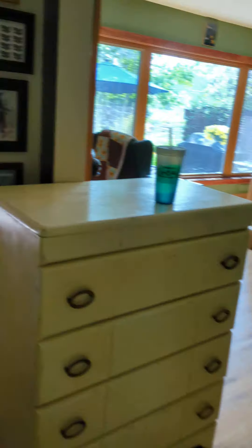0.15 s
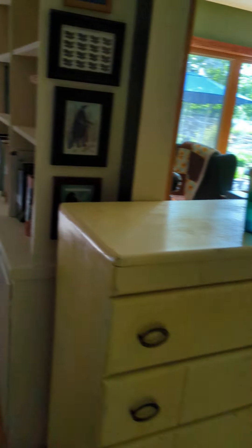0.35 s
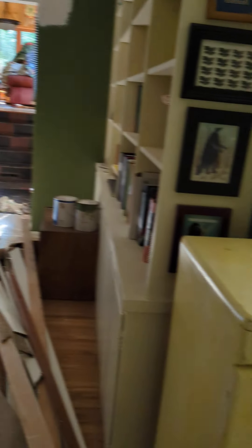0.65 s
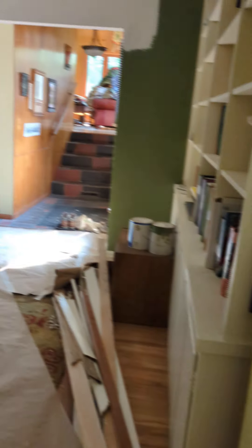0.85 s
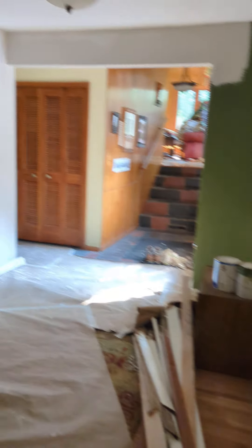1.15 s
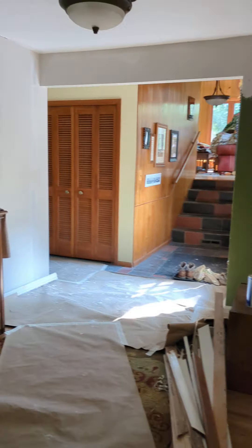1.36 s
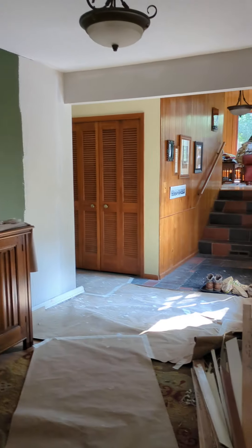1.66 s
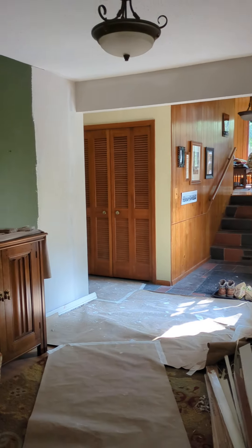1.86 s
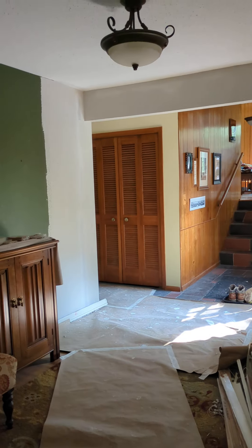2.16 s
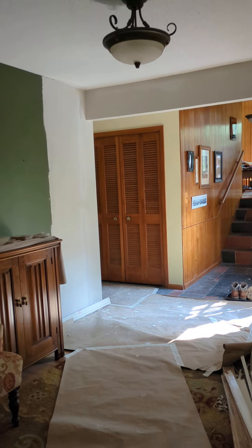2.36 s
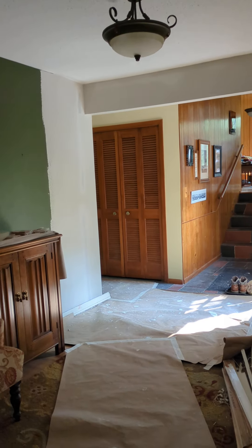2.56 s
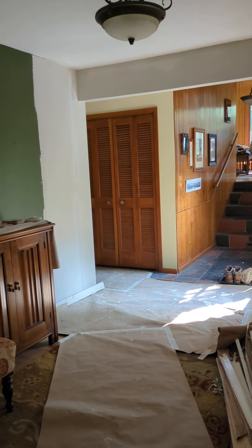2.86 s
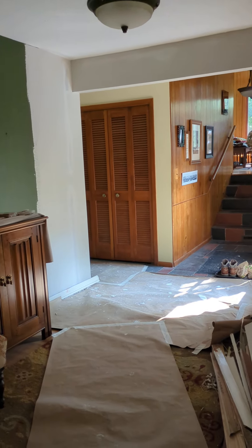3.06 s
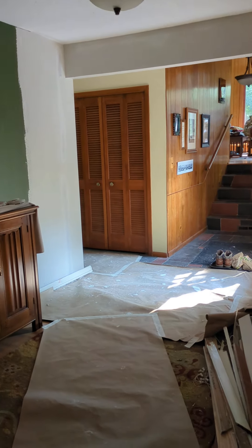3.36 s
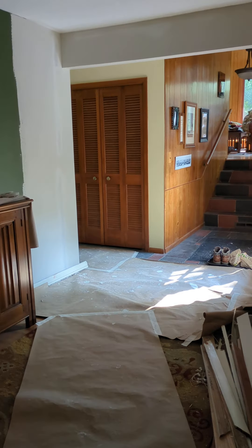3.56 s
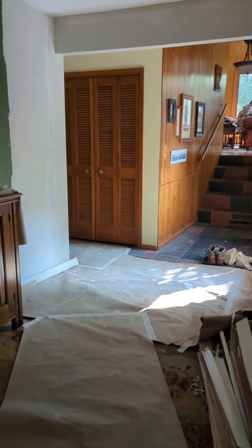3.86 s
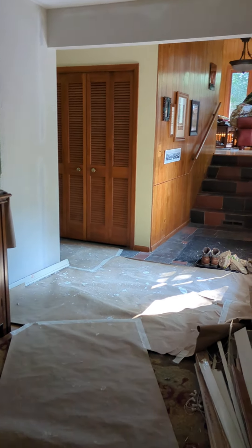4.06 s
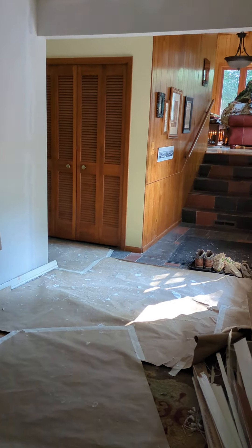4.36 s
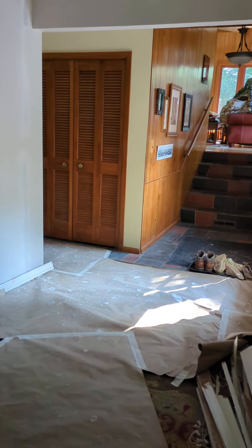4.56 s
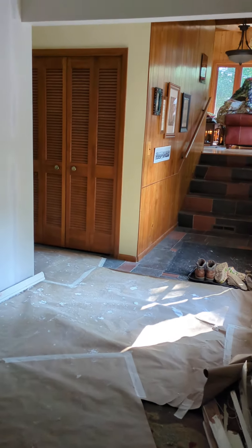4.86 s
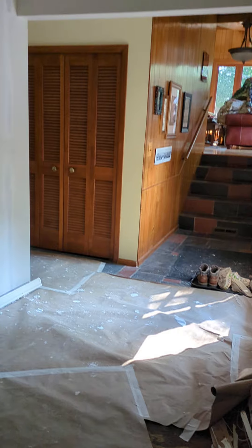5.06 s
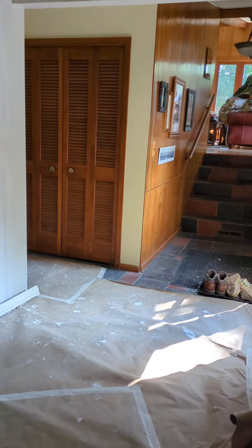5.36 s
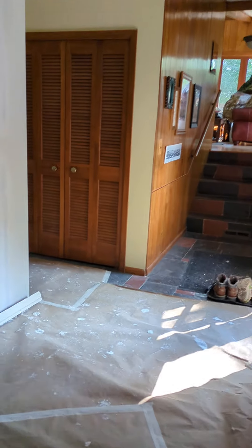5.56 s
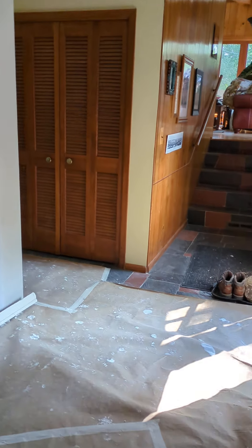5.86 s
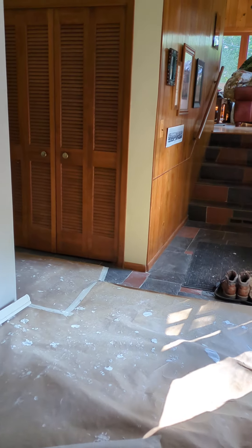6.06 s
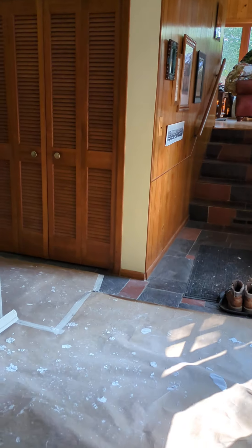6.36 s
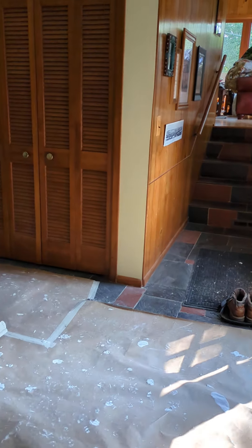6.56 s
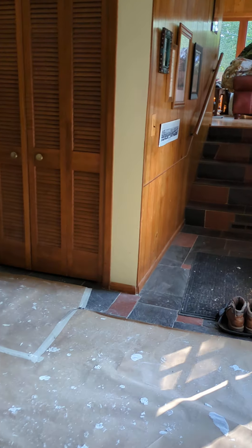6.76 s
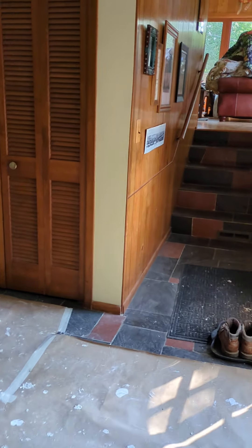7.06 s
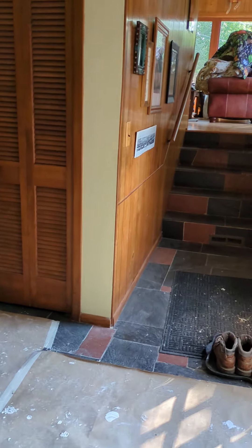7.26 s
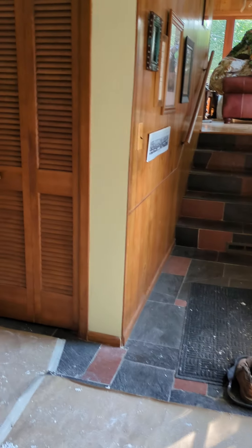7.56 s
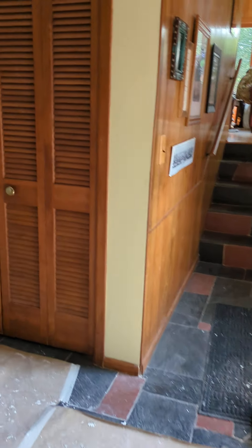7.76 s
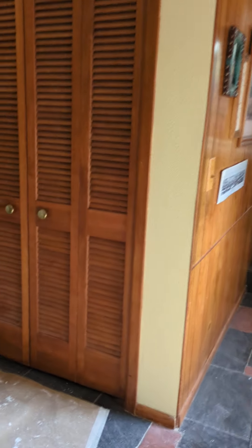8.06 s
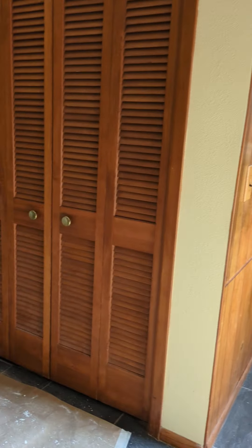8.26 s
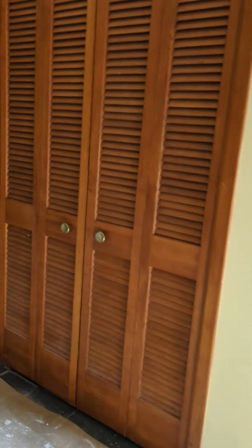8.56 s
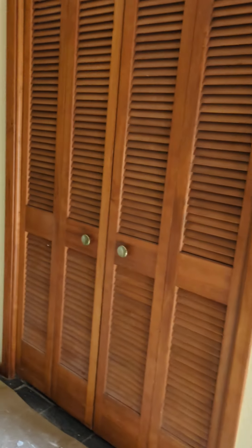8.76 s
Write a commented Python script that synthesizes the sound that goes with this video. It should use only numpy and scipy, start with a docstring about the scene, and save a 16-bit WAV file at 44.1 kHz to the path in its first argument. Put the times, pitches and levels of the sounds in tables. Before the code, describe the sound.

Inside a bare, lightly echoing hall, shoes tread stiff paper laid over a rug: crackling creases, sharp snaps, soft wooden thuds and a brief rubber squeak. The walker pauses amid faint distant taps and finger bumps on the handheld stereo microphone. Louder steps resume, the paper ticking as it springs back, then a wider, duller sheet crumples, slides and scuffs. A faint low machine hum fades behind.

```python
"""Bare hall of a house under renovation: someone walks over floor-protection paper, holding a two-port phone.
First, steps crush creases of stiff paper on a rug, creases snap, a rubber sole squeaks, the wooden floor thuds.
Then come distant taps and fingers bumping the case by the right port; steps resume and the runner ticks as it recoils.
Last, the walker treads a wide, duller sheet: snaps, slides, scuffs and more bumps, while a far machine's hum fades.
Creases are random pops in filtered colours, wood is ringing noise, the hall is made of early echoes and a tail."""
import sys
import numpy as np
from scipy import signal
from scipy.fft import rfft, irfft, next_fast_len
from scipy.io import wavfile

SR = 44100
rng = np.random.default_rng(int(sys.argv[2]) if len(sys.argv) > 2 else 0)


def generate_wav(signal):
    """Clip the signal to [-1, 1] and save it as 16-bit WAV at the path in sys.argv[1]."""
    frames = np.transpose(np.atleast_2d(signal))
    scaled = np.clip(frames, -1, 1) * 32767
    pcm = np.round(scaled).astype(np.int16)
    wavfile.write(sys.argv[1], SR, pcm)


N = 392490

# The sheet stirring around the walker. Each row: time in seconds, level in dB.
SHEET_STIR = [(0, -56.5), (1.1, -65.5), (1.9, -66), (2.2, -80.5), (3.68, -94), (3.75, -54.5), (5.3, -60),
              (6.3, -52), (8.9, -54.5)]
# Stiff paper runner on the rug. Each row: time in seconds, share (0 to 1) of crackle that comes from it.
ON_RUNNER = [(0, 0.93), (5.05, 0.78), (5.4, 0.29), (6, 0.18), (8.9, 0.21)]
# Colour of the stiff runner. Each row: frequency in Hz, relative density in dB per Hz.
RUNNER_COLOUR = [(100, -63.5), (200, -38.5), (500, -22), (800, -6), (1300, 1), (2000, 3), (2800, -2),
                 (4000, -7), (5500, -12), (8000, -23), (16000, -42.5)]
# Colour of the wide sheet. Each row: frequency in Hz, relative density in dB per Hz.
PAPER_COLOUR = [(200, -60.5), (500, -4.5), (750, -4), (1250, 0.5), (1600, -1.5), (1950, 0), (2400, -7.5),
                (3200, -7), (4500, -19), (8000, -23), (16000, -54)]
# Colour of the air pocket below the sheet. Each row: frequency in Hz, relative density in dB per Hz.
HOLLOW_COLOUR = [(40, -30), (100, -18), (220, -9), (330, 1.5), (500, 4), (700, -1.5), (1100, 1.5),
                 (3000, -56.5)]
# Colour of sharp little folds. Each row: frequency in Hz, relative density in dB per Hz.
CRISP_COLOUR = [(1500, -52.5), (3000, -3.5), (4000, 4.5), (6000, 5.5), (8200, -1.5), (10000, -3),
                (13000, -3.5), (16000, -17)]


def crumple(stir_hollow_db=-5, stir_crisp_db=-14, paper_db=0, hollow_db=0, crisp_db=-1):
    """Creases give way under the soles: the sheet's own voice, the air pocket below it and sharp little folds."""
    power = (amp(curve(SHEET_STIR)) * amp([[0], [stir_hollow_db], [stir_crisp_db]])) ** 2
    for s, rise, t60, db, hollow, crisp in presses():
        levels = amp([[db], [db + hollow], [db + crisp]])
        add(power, s, (levels * swell(rise, t60)) ** 2)
    paper, pocket, folds = np.sqrt(power)
    pops = clumps() * creases(rate=1000, spread_db=7)
    # the walker leaves the runner for the wide, duller sheet
    runner = np.clip(curve(ON_RUNNER), 0, 1)
    voice = np.sqrt(runner) * crackle(pops, RUNNER_COLOUR)
    voice = voice + np.sqrt(1 - runner) * crackle(pops, PAPER_COLOUR)
    sheet_sound = amp(paper_db) * paper * voice
    pocket_sound = amp(hollow_db) * pocket * crackle(pops, HOLLOW_COLOUR)
    fold_sound = amp(crisp_db) * folds * crackle(pops, CRISP_COLOUR)
    return sheet_sound + pocket_sound + fold_sound


# A step rolls from heel to sole, then the other foot pushes off.
# Each row: start in seconds, heel level in dB, sole delay in seconds, sole level in dB, push-off delay in
# seconds, push-off level in dB, hollow and crisp parts in dB re level, landing and push-off thud in dB,
# pitch of that spot as a ratio to the floor's modes.
STEPS = [(0.226, -43.5, 0.028, -44, .23, -51.5, -2.5, -5.5, -45, -60.5, 0.803),
         (0.729, -62, 0.019, -84, 0.17, -37, -12.5, -31, -40.5, -63, 1.8),
         (0.992, -35, 0.066, -35.5, 0.3, -52, -6, -26.5, -47.5, -63, 0.92),
         (1.658, -43.5, 0.021, -43.5, 0.14, -53, -7.5, -25, -58.5, -69, 0.54),
         (3.874, -25.5, 0.036, -41.5, 0.2, -32, -15, -18, -35.5, -56.5, 1.25),
         (4.729, -29, 0.056, -42.5, 0.22, -40, -11.5, -14.5, -47, -45, 1.073),
         (5.52, -31.5, 0.098, -36.5, 0.2, -39, -7.5, -15.5, -49, -61, 1.05),
         (6.207, -32, 0.083, -34.5, 0.249, -38, -7, -12.5, -57, -61, 2.2),
         (6.949, -32, 0.1, -35, 0.2, -35, -7, -12.5, -52, -76, 1.08),
         (7.702, -29.5, 0.082, -26.5, 0.26, -35, -8, -18, -41.5, -61, 2.42),
         (8.525, -24.5, 0.11, -39, 0.19, -32, -7, -14.5, -43, -53, 2.3)]
# The swinging foot brushes the sheet. Each row: start in seconds, rise in seconds,
# 60 dB decay in seconds, level in dB, hollow part in dB re level.
SCUFFS = [(.275, 0.033, 0.32, -40, -6.5), (3.75, 0.027, 0.54, -41.5, -8), (4.596, 0.017, 1, -42, -3),
          (5.316, 0.0099, 0.21, -34, -12.5), (5.44, 0.029, 0.96, -39.5, -7), (6.061, .002, 0.12, -33.5, -6),
          (6.181, .005, 0.18, -35.5, -17), (6.39, 0.014, 0.28, -39, -3), (7.491, 0.0064, 0.11, -34.5, -15),
          (7.679, 0.028, .3, -36.5, -9), (8.082, 0.011, 0.64, -35.5, -11.5), (8.486, 0.019, 0.4, -34, -4.5),
          (8.824, .025, 0.14, -26.5, -9)]
# How each part of a step loads the sheet. Each row: rise in seconds, 60 dB decay on the runner and
# on the wide sheet in seconds, hollow and crisp parts in dB re the step's own.
HEEL = (.024, .1, 0.36, -3.1, 0.41)
SOLE = (0.012, 0.18, 0.43, 0.044, 0)
PUSH_OFF = (0.031, 0.24, 0.47, 0.33, 1)


def presses(scuff_crisp_db=-17.5, settle_db=-10, settle_rise_s=0.029, settle_t60_s=1):
    """Every load on the sheet: start s, rise s, 60 dB decay s, level dB, hollow dB and crisp dB re level."""
    loads = [(*scuff, scuff_crisp_db) for scuff in SCUFFS]
    for s, heel_db, sole_s, sole_db, push_s, push_db, hollow, crisp, *_ in STEPS:
        runner = np.clip(np.interp(s, *np.transpose(ON_RUNNER)), 0, 1)
        for after, db, part in [(0, heel_db, HEEL), (sole_s, sole_db, SOLE), (push_s, push_db, PUSH_OFF)]:
            rise, runner_t60, sheet_t60, part_hollow, part_crisp = part
            t60 = runner * runner_t60 + (1 - runner) * sheet_t60
            loads.append((s + after, rise, t60, db, hollow + part_hollow, crisp + part_crisp))
        # the trodden sheet rustles on, re the sole's level
        loads.append((s, settle_rise_s, settle_t60_s, sole_db + settle_db, hollow, crisp))
    return loads


def clumps(clump_db=1.5, clumps_per_s=90):
    """One crease sets off its neighbours: a randomly wandering gain groups them into little avalanches."""
    place = np.arange(N) / SR * clumps_per_s
    strength = np.clip(rng.standard_normal(SR), -2, 2)
    return amp(clump_db * np.interp(place, np.arange(SR), strength))


def creases(rate, spread_db):
    """Tiny pops at random moments, rate per second, most weak and a few strong."""
    gives_way = rng.random(N) < rate / SR
    return gives_way * amp(spread_db * np.minimum(rng.standard_normal(N), 2.5))


def crackle(pops, spectrum):
    """Pops of random sign in the colour of the sheet, rms 1."""
    return unit(coloured(pops * rng.choice([-1, 1], N), spectrum))


# The loudest creases buckle. Each row: start in seconds, relative ring level in dB, ring in Hz,
# relative crisp level in dB re ring.
SNAPS = [(0.272, -27.5, 1630, -4), (0.461, -39.5, 2630, -15), (0.936, -26.5, 1860, -28),
         (1.0005, -25, 2180, -28), (1.018, -21, 1660, -30), (1.067, -21, 2120, -34),
         (1.077, -18.5, 2950, -21), (1.294, -39, 2170, -19), (1.694, -25, 2650, -39),
         (1.93, -36, 1790, -35), (3.716, -39.5, 2650, -10.5), (3.778, -26.5, 2480, -28),
         (3.884, -20, 2000, -13), (3.897, -15, 2300, -30), (4.071, -33, 1650, -27),
         (4.093, -29.5, 2060, -10), (4.739, -22, 2040, -17), (4.7519, -18, 1770, -16),
         (4.956, -36, 1940, -18), (5.552, -29, 1755, 0.5), (5.621, -20, 1400, -1.5),
         (5.672, -25.5, 2120, -0.5), (5.787, -33, 1750, -30), (5.922, -33, 1590, -2.5),
         (6.1816, -26.5, 1640, -24), (6.271, -31.5, 1930, 3.5), (6.512, -24.5, 1490, -22),
         (6.962, -26.5, 1440, -7), (7.071, -34, 1380, 5), (7.186, -26, 2700, -19), (7.492, -22, 3240, -7.5),
         (7.721, -34.5, 2060, 15), (7.823, -22.5, 1870, 7), (8.029, -22, 1650, 5.5),
         (8.182, -29, 1590, 6.5), (8.767, -30, 2000, -20)]


def snaps(ring_db=3, crisp_db=0, ring_t60=0.022, crisp_t60=0.022, width_hz=600, sheet_share=0.33):
    """A crease flips with a sharp tick and rings its own patch of sheet."""
    track, t = np.zeros(N), np.arange(SR // 16) / SR
    for s, db, hz, crisp in SNAPS + recoil() + stray_snaps():
        ring_noise, tick_noise = rng.standard_normal((2, len(t)))
        sheet = coloured(ring_noise * amp(-60 * t / ring_t60), PAPER_COLOUR)
        ring = resonant(sheet, hz, width_hz) + sheet_share * sheet
        tick = coloured(tick_noise * amp(-60 * t / crisp_t60), CRISP_COLOUR)
        ring = amp(db + ring_db) * ring / np.abs(ring).max()
        tick = amp(db + crisp + crisp_db) * tick / np.abs(tick).max()
        add(track, s, ring + tick)
    return track


def stray_snaps(count=3, fade_db=8, level_db=-1, spread_db=5, within_s=.35, mid_hz=1894, crisp_db=-7):
    """Lesser creases flip at random as the foot rolls, the later the weaker, re the sole's level."""
    strays = []
    for s, _, sole_s, sole_db, *_ in STEPS:
        for late, force, pitch in rng.random((count, 3)):
            start = s + sole_s + late * within_s
            db = sole_db + level_db - fade_db * late + spread_db * (2 * force - 1)
            strays.append((start, db, mid_hz * 2 ** (pitch - .5), crisp_db))
    return strays


def recoil(count=6, start_s=4.2615, gap_s=.064, level_db=-31.5, loss_db=3, hz=2150, crisp_db=-4):
    """The runner springs back in fading ticks as a foot leaves it."""
    return [(start_s + k * gap_s, level_db - k * loss_db, hz, crisp_db) for k in range(count)]


# A shoe or trouser leg slides. Each row: start in seconds, rise in seconds, 60 dB decay in seconds, level in dB.
SLIDES = [(0.096, 0.012, 0.37, -45), (.47, 0.22, 0.29, -55.5), (0.829, 0.0091, 0.46, -37),
          (3.05, 0.016, 2.5, -69), (3.169, 0.13, 1.5, -57), (3.39, .12, 0.34, -52.5),
          (3.714, 0.0053, 0.71, -55.5), (4.24, 0.013, 2.1, -50.5), (4.95, 0.0079, 2, -53.5),
          (5.0, 0.22, .2, -51.5), (5.314, 0.062, 0.4, -34), (6.06, 0.0075, 0.15, -40.5),
          (6.6, 0.089, 0.24, -51), (8.77, 0.052, 0.25, -41.5)]
# Colour of the slide's hiss. Each row: frequency in Hz, relative density in dB per Hz.
HISS_COLOUR = [(100, -24.5), (300, 0.5), (900, -4), (1400, 5), (2200, 5.5), (3200, 2.5), (6000, 0.5),
               (9000, -6), (12000, -7.5), (16000, -20.5)]
# The top end of a hard slide. Each row: frequency in Hz, relative density in dB per Hz.
SIZZLE_COLOUR = [(5000, -45), (8000, -8), (10000, -9), (13000, -11), (16000, -20.5)]


def slides(sizzle_db=-2, hard_db=-35):
    """A sliding surface catches on very many fine fibres; the harder it slides, the brighter it hisses."""
    power = np.zeros(N)
    for s, rise, t60, db in SLIDES:
        add(power, s, (amp(db) * swell(rise, t60)) ** 2)
    pressure = np.sqrt(power)
    fibres = creases(rate=12000, spread_db=4)
    brightness = amp(sizzle_db) * np.sqrt(pressure / amp(hard_db))
    return pressure * (crackle(fibres, HISS_COLOUR) + brightness * crackle(fibres, SIZZLE_COLOUR))


# A rubber sole squeaks. Each row: start in seconds, rise in seconds, 60 dB decay in seconds,
# level in dB, pitch in Hz.
SQUEAKS = [(.832, 0.0085, 0.16, -39.5, 2440), (.85, 0.016, 0.053, -29, 2095)]


def squeaks(width_hz=330):
    """Rubber sticks and slips unevenly around one pitch: noise through the same resonance twice."""
    track = np.zeros(N)
    for s, rise, t60, db, hz in SQUEAKS:
        slip = resonant(rng.standard_normal(SR), hz, width_hz)
        slip = resonant(slip, hz, width_hz)
        add(track, s, amp(db) * swell(rise, t60) * unit(slip))
    return track


# Modes of the wooden floor, before each spot's pitch ratio.
# Each row: frequency in Hz, width in Hz, relative level in dB.
BOARDS = [(110, 48, -14.5), (180, 24, 4), (290, 28, 13.5), (469, 200, -2)]


def thuds(level_db=-1, land_rise_s=0.0057, push_rise_s=0.042, t60=0.14, knock_db=-5, knock_t60=0.065):
    """The rolling foot shakes the floor's low modes, heel and sole each by its load; stiffer spots ring higher."""
    track = np.zeros(N)
    for s, first_db, sole_s, sole_db, push_s, *_, land_db, push_db, pitch in STEPS:
        weight_db = land_db - max(first_db, sole_db)  # the heavier of heel and sole gets the landing level
        blows = [(0, first_db + weight_db, land_rise_s),
                 (sole_s, sole_db + weight_db, land_rise_s),
                 (push_s, push_db, push_rise_s)]
        for after, db, rise in blows:
            push = rng.standard_normal(SR)
            wood = sum(amp(level) * resonant(push, hz * pitch, width * pitch) for hz, width, level in BOARDS)
            # the contact itself: a short broad knock
            knock = amp(knock_db) * swell(rise, knock_t60) * unit(coloured(push, PAPER_COLOUR))
            add(track, s + after, amp(db + level_db) * (swell(rise, t60) * unit(wood) + knock))
    return coloured(track, [(25, -8), (60, 12.0), (700, 0.5), (1500, 1), (5000, -57)])


# Fingers bump the phone. Each row: start in seconds, relative level in dB, click in dB re level.
BUMPS = [(3.024, -36.5, 12), (3.029, -45, 20.5), (3.033, -47, 21), (3.521, -29, -27), (5.683, -11, -19),
         (5.686, -12, -36), (5.691, -10, -32), (7.9537, -6.5, 14)]


def bumps(drop_hz=1100, end_hz=110, fall_s=0.00226, t60=0.032, click_t60=0.0076):
    """A touch on the case, strongest at the right port: a click and a short pop that sinks in pitch."""
    track, t = np.zeros(N), np.arange(SR // 16) / SR
    pitch = end_hz + drop_hz * np.exp(-t / fall_s)
    pop = np.sin(2 * np.pi * np.cumsum(pitch) / SR) * amp(-60 * t / t60)
    for s, db, click_db in BUMPS:
        click = resonant(rng.standard_normal(len(t)) * amp(-60 * t / click_t60), 6800, 7400)
        add(track, s, amp(db) * (pop + amp(click_db) * click / np.abs(click).max()))
    case = coloured(track, [(25, -4), (70, -11.5), (8500, -15), (10500, -25), (16000, -28)])
    return case * amp([[-16], [0]])  # left, right


PORT_LAG = 19  # samples by which the direct sound reaches the left port later


def hall(x, direct_db=-7.5, early_db=-1.5, tail_db=-7):
    """Direct sound, early echoes and tail; long waves of the echoes reach both ports alike."""
    size = next_fast_len(N)
    a, b = rfft(amp(early_db) * near_walls(x) + amp(tail_db) * far_walls(x), size)
    alike = np.sinc(2 * np.linspace(0, .5, len(a)) * PORT_LAG)
    left = alike * b + np.sqrt(1 - alike ** 2) * a
    echoes = irfft([left, b], size)[:, :N]
    return amp(direct_db) * straight(x) + echoes


def straight(x):
    """The direct path reaches the lower (right) port first."""
    return np.array([np.pad(x, (PORT_LAG, 0))[:N], x])


def near_walls(x, t60=0.14, size=512):
    """Every patch of sheet lies elsewhere, so each few milliseconds of sound get their own early echoes."""
    hop = size // 2
    frames = np.lib.stride_tricks.sliding_window_view(np.pad(x, (0, size)), size)[::hop]
    pieces = rfft(frames * signal.get_window('hann', size), 8 * size)
    t = np.arange(6 * size) / SR
    decay = amp(-60 * t / t60) * (t > .002)  # no echo in the first 2 ms
    paths = rng.standard_normal((2, len(pieces), len(t))) * decay / np.linalg.norm(decay)
    echoes = irfft(rfft(paths, 8 * size) * pieces)
    # overlap-add all pieces at each port
    where = np.arange(len(pieces))[:, None] * hop + np.arange(echoes.shape[-1])
    return np.array([np.bincount(where.ravel(), side.ravel())[:N] for side in echoes])


# Reverberation of the bare hall. Each row: frequency in Hz, 60 dB decay in seconds.
HALL_DECAY = [(100, 0.68), (500, 0.37), (2000, 0.33), (6000, 0.54), (15000, 0.74)]


def far_walls(x):
    """The hall's tail, changing three times a second as the walker moves."""
    out, hop = np.zeros((2, N)), SR // 3
    for i in range(0, N, hop):
        hz, t, z = signal.stft(rng.standard_normal((2, SR // 2)), SR, nperseg=256)
        decay = amp(-60 * t / along(HALL_DECAY, hz)[:, None]) * np.minimum(t / 0.021, 1)
        tail = signal.istft(z * decay, SR, nperseg=256)[1]
        tail = tail / np.linalg.norm(tail[0])
        add(out, i / SR, signal.fftconvolve(x[None, i:i + hop], tail, axes=1))
    return out


# Light taps in the next room. Each row: start in seconds, level in dB.
TAPS = [(2.284, -48.5), (2.564, -52.5), (2.584, -43.5)]
# Colour of the taps. Each row: frequency in Hz, relative level in dB.
TAP_COLOUR = [(200, -15.5), (600, -9), (1000, -4.5), (1400, -0.5), (2700, -0.5), (4000, -4.5), (6500, -9.5),
              (9000, -15.5), (16000, -32)]


def taps(blow_t60=0.053, echo_db=-7, echo_t60=0.39):
    """Distant taps arrive as a short smear and a long diffuse echo."""
    power = np.zeros(N)
    for s, db in TAPS:
        blow = swell(0.0011, blow_t60)
        echo = amp(echo_db) * swell(0.015, echo_t60)
        add(power, s, amp(db) ** 2 * (blow ** 2 + echo ** 2))
    return np.sqrt(power) * diffuse(TAP_COLOUR)


# A far machine, left behind. Each row: time in seconds, level in dB.
HUM_LEVEL = [(0, -68.5), (1.5, -71), (2.8, -75), (3.3, -77.5), (8.9, -81)]
# Colour of the machine's rumble. Each row: frequency in Hz, relative level in dB.
HUM_COLOUR = [(20, -35), (40, -15.5), (68, -5), (115, -3), (160, -6), (240, -44), (500, -44), (2000, -86)]
# Colour of the faint hiss. Each row: frequency in Hz, relative level in dB.
AIR_COLOUR = [(100, 10), (450, -0.5), (950, -11.5), (1250, 5), (2500, -10.5), (7000, -7), (12000, -16),
              (16000, -35)]


def house(air_db=-76.5):
    """Low machine rumble, the same at both ports, with a faint hiss that differs between them."""
    rumble = amp(curve(HUM_LEVEL)) * unit(coloured(rng.standard_normal(N), HUM_COLOUR))
    return rumble + amp(air_db) * diffuse(AIR_COLOUR)


def diffuse(spectrum):
    """Noise of rms 1, unrelated at the two ports."""
    return np.array([unit(coloured(side, spectrum)) for side in rng.standard_normal((2, N))])


def amp(db):
    """Decibels to gain."""
    return 10 ** (np.asarray(db) / 20)


def unit(x):
    """Scaled to rms 1."""
    return x / np.sqrt(np.mean(x ** 2) + 1e-20)


def along(points, hz):
    """Values between (Hz, value) points on a log frequency axis."""
    f, v = np.transpose(points)
    return np.interp(np.log(hz + 1), np.log(f), v)


def curve(rows):
    """(s, value) rows as one value per sample."""
    return np.interp(np.arange(N) / SR, *np.transpose(rows))


def add(track, s, sound):
    """Mix a sound in at time s."""
    i = min(round(s * SR), N)
    track[..., i:i + sound.shape[-1]] += sound[..., :N - i]


def coloured(x, points, size=8192):
    """Causal minimum-phase filter with the gain of (Hz, dB) points."""
    cepstrum = irfft(np.log(amp(along(points, np.fft.rfftfreq(size, 1 / SR)))))
    # fold the cepstrum forward in time
    cepstrum[1:size // 2] *= 2
    cepstrum[size // 2 + 1:] = 0
    return signal.oaconvolve(x, irfft(np.exp(rfft(cepstrum))))[:len(x)]


def resonant(x, hz, width_hz):
    """One damped resonance."""
    return signal.lfilter(*signal.iirpeak(hz, hz / width_hz, SR), x)


def swell(rise, t60):
    """One second of gain that builds up and then dies away."""
    t, rise = np.arange(SR) / SR, max(rise, 1e-3)
    return np.minimum(t / rise, 1) * amp(-60 * np.maximum(t - rise, 0) / t60)


# The lower port's colour for sound from the feet. Each row: frequency in Hz, gain in dB.
PORT_COLOUR = [(100, -1.7), (300, 2.2), (600, 2.5), (1000, 3), (1800, 5.5), (2400, -1.5), (3300, 4),
               (4200, 2.5), (5200, 8.5), (6300, 10), (8200, 15.5), (9600, 2.5), (12000, -0.5),
               (15000, -2.5)]
# Sound arriving from right below the phone. Each row: time in seconds, share (0 to 1).
UNDERFOOT = [(0, 0.072), (2.9, 0.2), (3.4, 0.48), (3.8, 0.72), (8.9, 0.76)]


def scene(snap_room_db=-4, snap_direct_db=-6):
    """Steps in the hall; raised creases snap straight at the phone, whose lower port hears the feet brighter."""
    cracks = snaps()
    steps = crumple() + slides() + squeaks() + thuds()
    in_hall = hall(steps + amp(snap_room_db) * cracks)
    left, right = in_hall + amp(snap_direct_db) * straight(cracks)
    below = np.clip(curve(UNDERFOOT), 0, 1)
    right = (1 - below) * right + below * coloured(right, PORT_COLOUR)
    return np.array([left, right]) + taps() + bumps() + house()


def record(dry, low_cut_hz=48, top_hz=15850):
    """The phone drops the deepest bass and keeps nothing above its band limit."""
    dry = signal.sosfilt(signal.butter(4, low_cut_hz, 'high', fs=SR, output='sos'), dry)
    size = next_fast_len(N + SR // 2)
    in_band = np.fft.rfftfreq(size, 1 / SR) < top_hz
    return irfft(rfft(dry, size) * in_band, size)[:, :N]


dry = scene()
out = record(dry)
generate_wav(out)
```